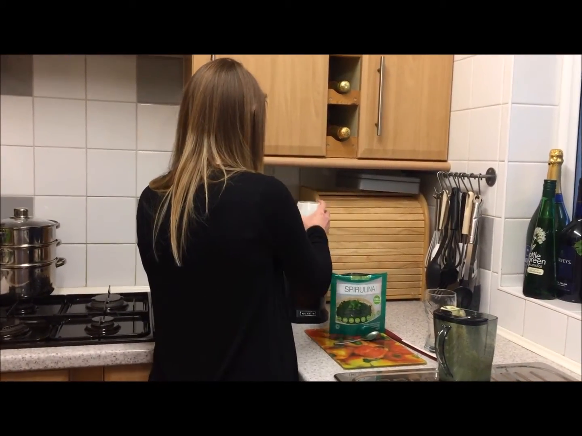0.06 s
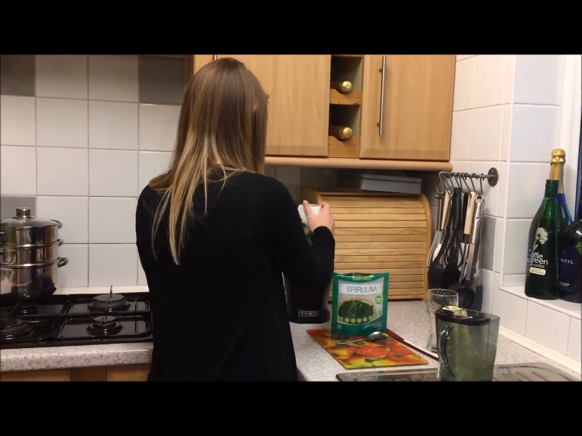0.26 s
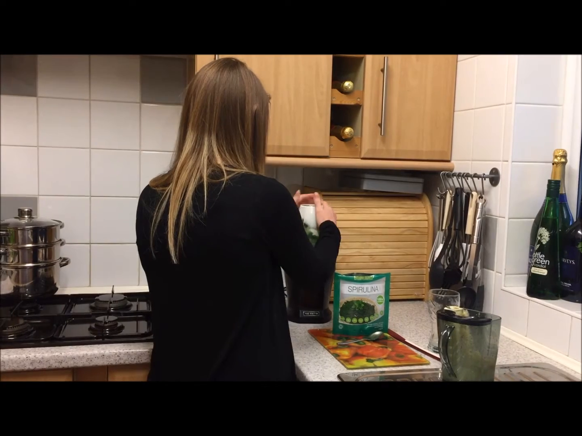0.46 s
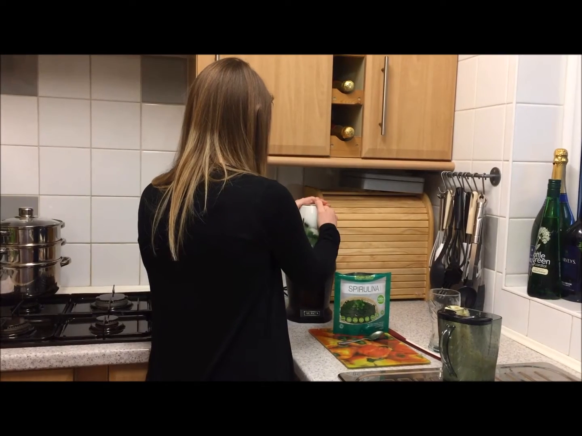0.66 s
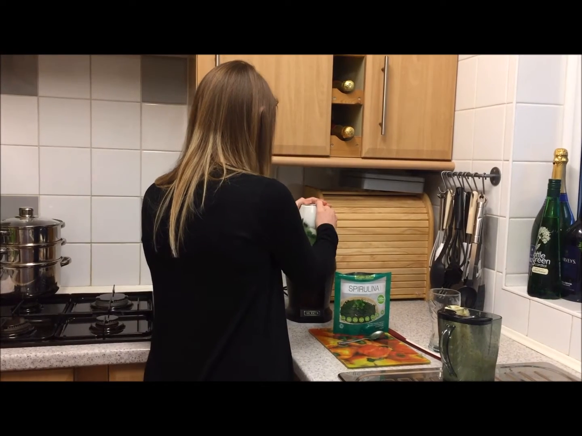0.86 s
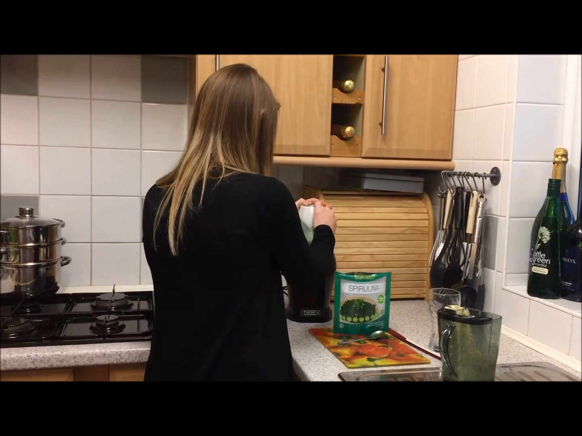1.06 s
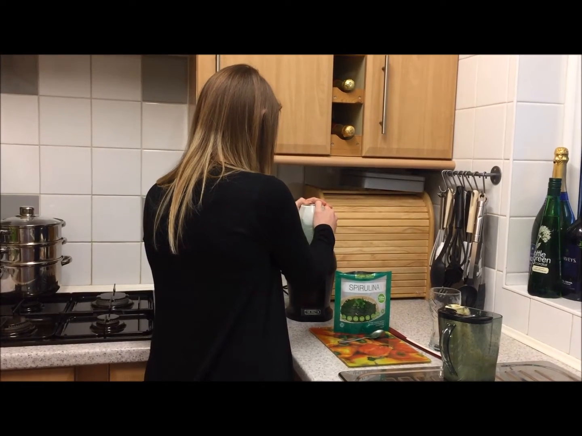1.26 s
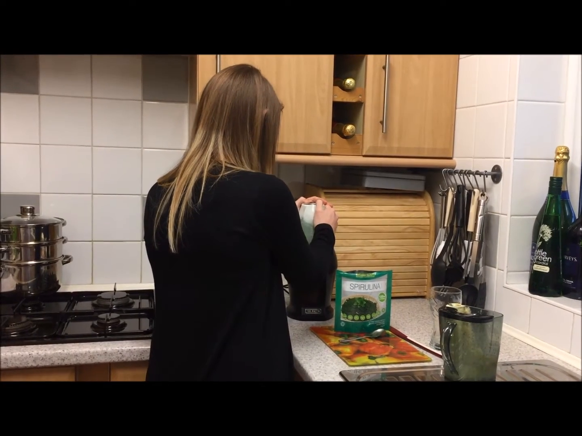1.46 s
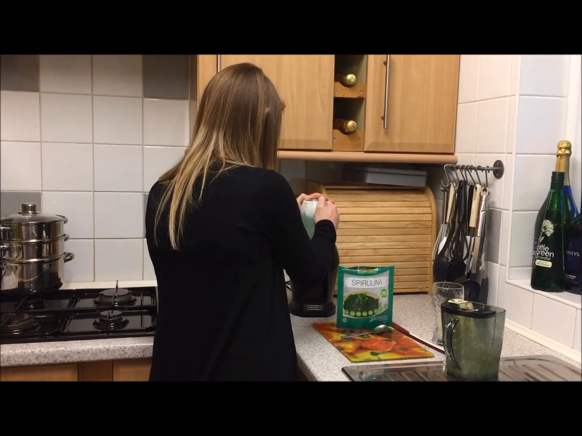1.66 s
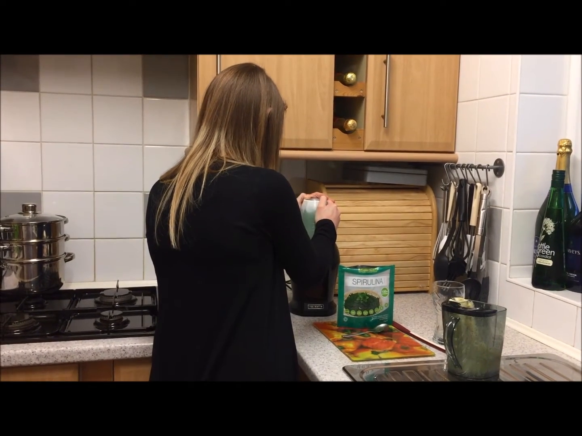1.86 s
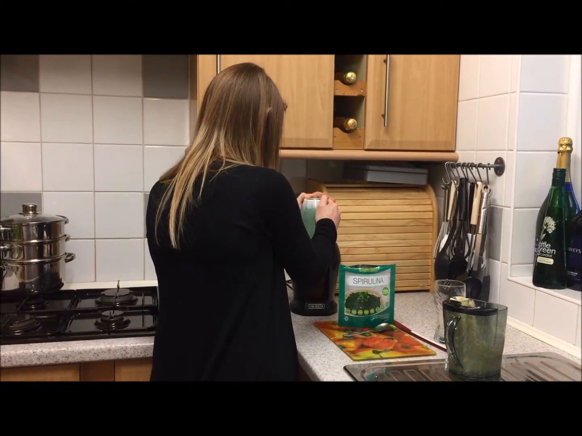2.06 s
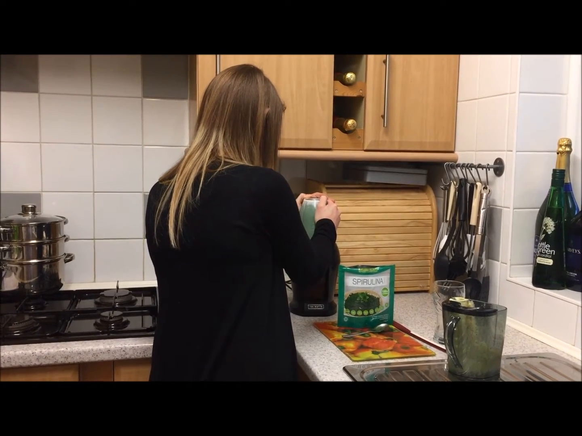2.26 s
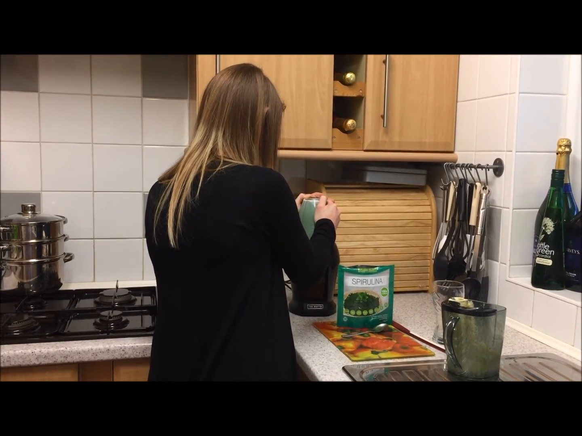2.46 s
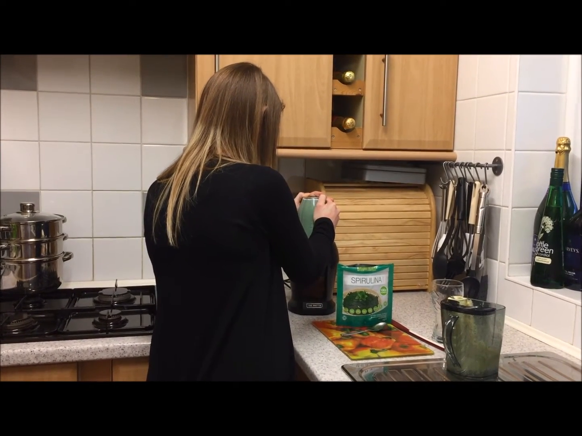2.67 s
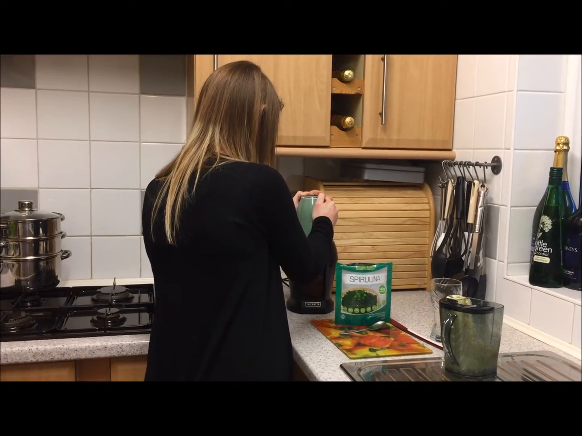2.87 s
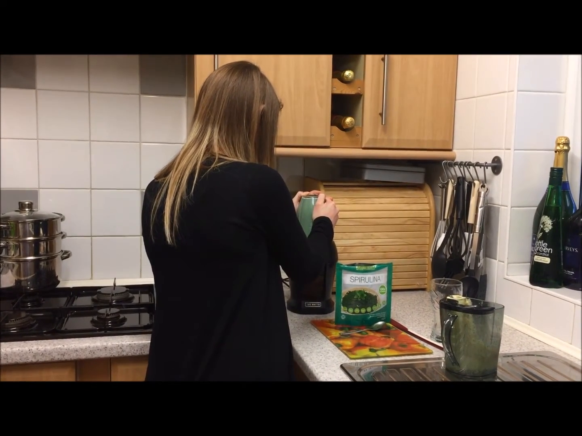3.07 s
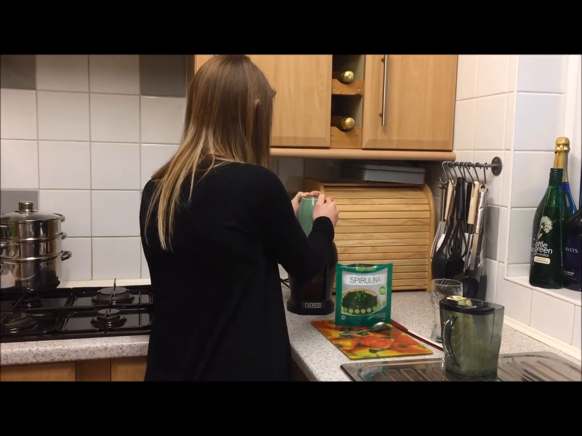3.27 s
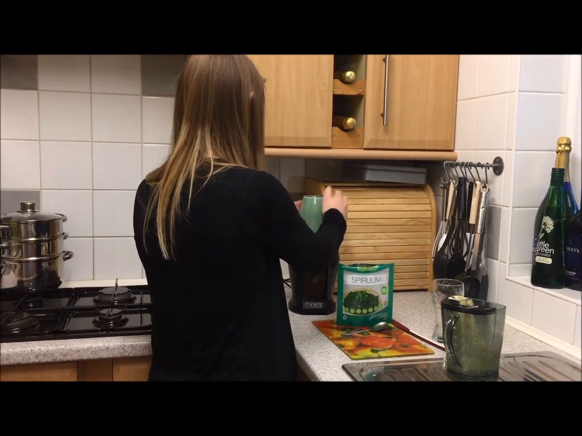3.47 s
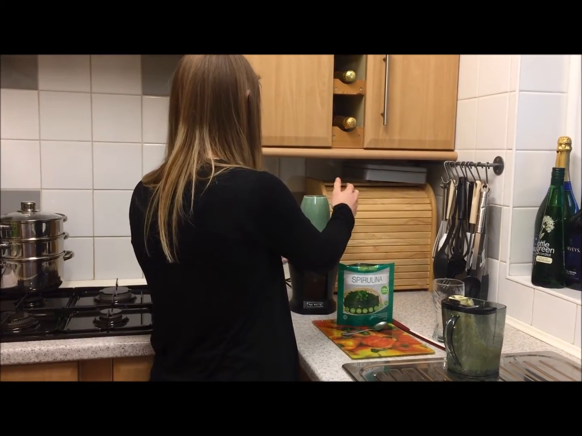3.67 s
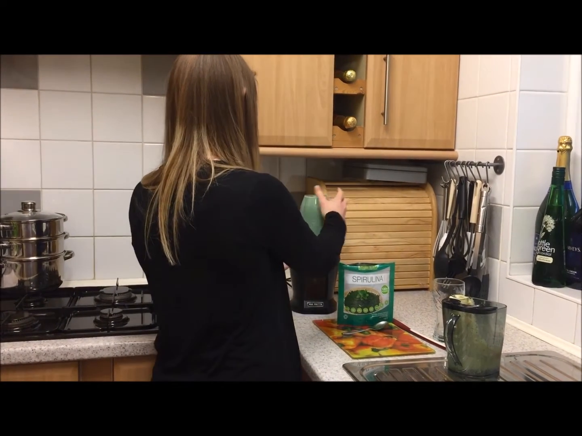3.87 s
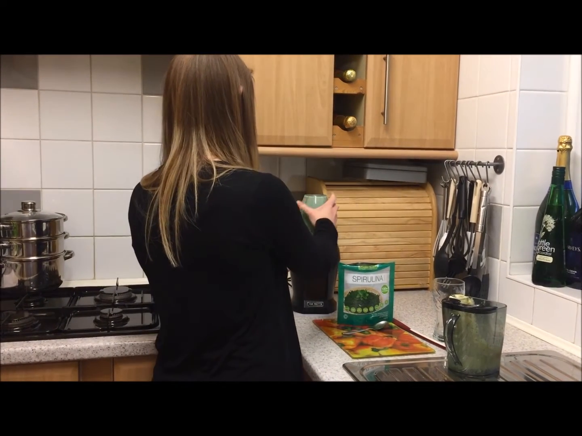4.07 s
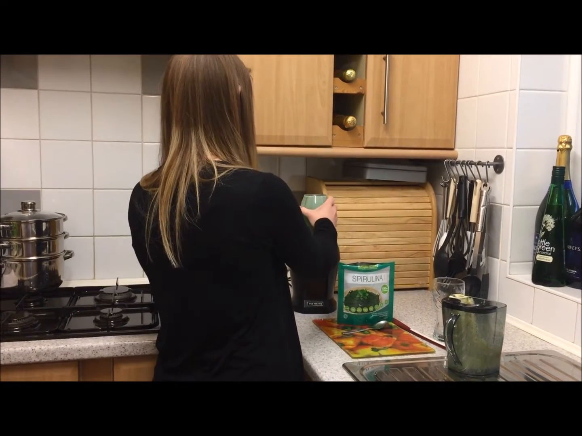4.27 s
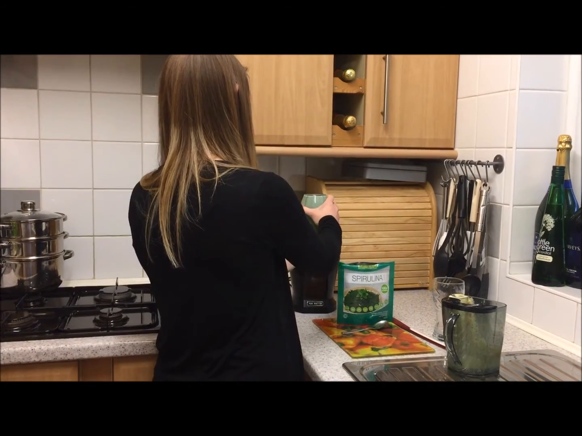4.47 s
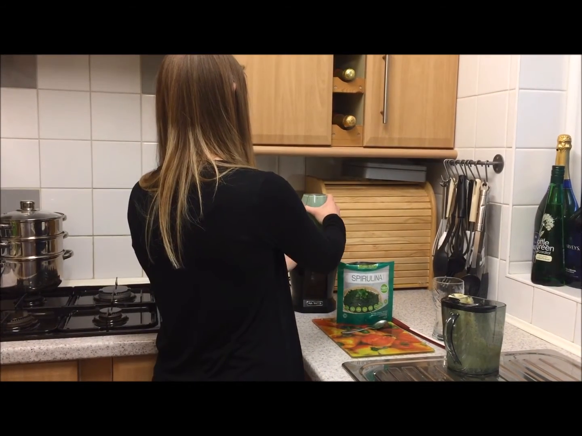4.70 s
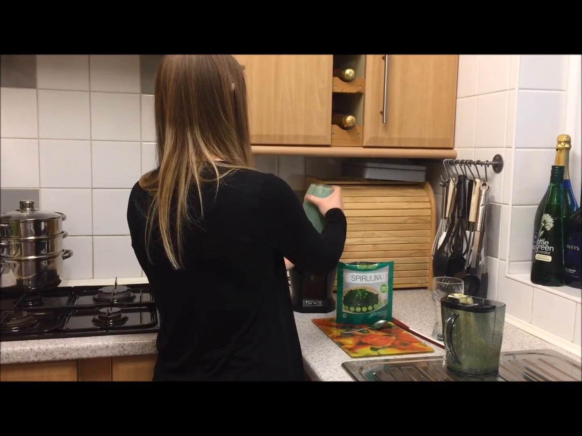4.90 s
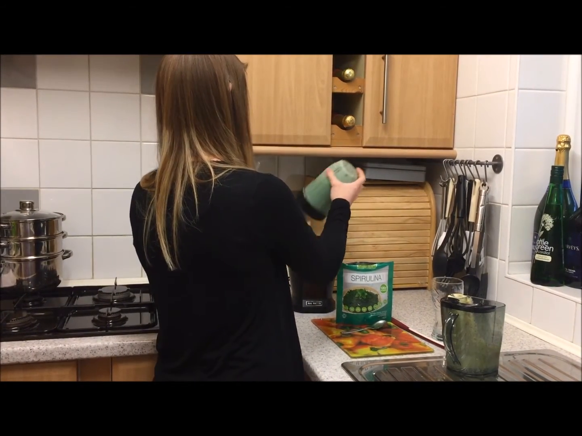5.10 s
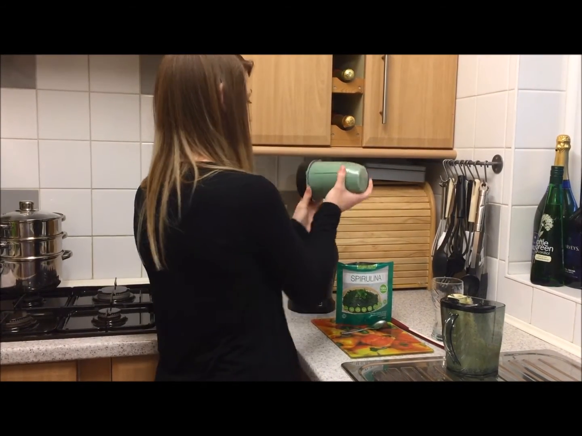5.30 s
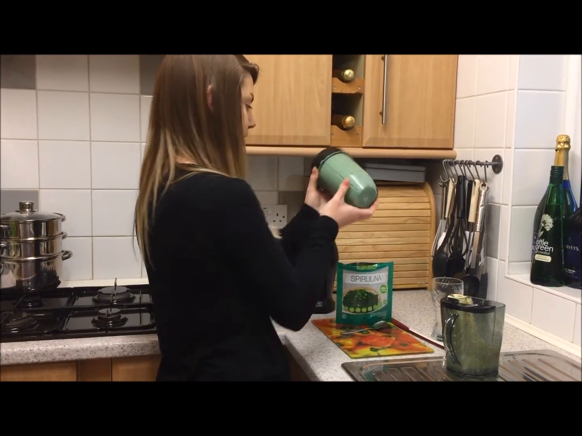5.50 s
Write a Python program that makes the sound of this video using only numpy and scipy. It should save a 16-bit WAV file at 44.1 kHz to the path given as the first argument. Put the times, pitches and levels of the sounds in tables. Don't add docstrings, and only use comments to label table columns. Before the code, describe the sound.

Close on a tiled kitchen counter, hands thump and rustle a plastic cup onto a blender base. After a pause, lugs clack and the motor spins up with a rough grind. It suddenly jumps two octaves into a shrill, hissing, fast-forward whine, then drops back and coasts down. A small squeak, a loud unlocking clack and a few light knocks follow over faint fridge hum.

```python
import sys
import numpy as np
from scipy import signal
from scipy.fft import rfft, irfft, next_fast_len
from scipy.io import wavfile
from scipy.ndimage import uniform_filter1d, minimum_filter1d

SR = 44100
rng = np.random.default_rng(int(sys.argv[2]) if len(sys.argv) > 2 else 0)


def generate_wav(sig):
    pcm = np.round(np.clip(np.atleast_2d(sig).T, -1, 1) * 32767).astype(np.int16)
    wavfile.write(sys.argv[1], SR, pcm)


def volts_from_db(level):
    exponent = np.asarray(level, float) / 20
    return 10 ** exponent


N = 244342

FAST, FAST_FROM, FAST_TO = 4, 1.569, 3.470
POWER_OFF = 3.336
FREE_HZ = 251.5
# time in seconds, level in dB.
GRIND_LEVEL = [(1.105, -32.5), (1.14, -29), (1.2, -29), (1.235, -23.5), (1.265, -29.5), (1.34, -26),
               (1.37, -26.5), (1.43, -25), (1.56, -25.5), (1.58, -29.5), (3.33, -29.5), (3.355, -31),
               (3.42, -31), (3.47, -33), (3.62, -38), (3.8, -44), (4.05, -61.5), (4.2, -81)]
# frequency in Hz, density in dB per Hz.
COUNTER_COLOUR = [(30, -29), (60, -6.5), (110, -5), (170, 7.5), (300, 6.5), (400, -0.5), (500, -7.5),
                  (900, -8), (1500, -45)]


def evened(x):
    return x / np.sqrt(np.mean(x ** 2) + 1e-20)


def add(mix, s, sound):
    part = mix[round(s * SR):][:len(sound)]
    part += sound[:len(part)]


def drift(size, per_s):
    knots = rng.standard_normal(int(size / SR * per_s) + 2)
    return np.interp(np.arange(size) * per_s / SR, np.arange(len(knots)), knots)


def coloured(x, points, speed=1, casing=0, low_hz=0, high_hz=30000):
    # true-speed frequency in Hz, width in Hz, lift in dB.
    resonances = [(56.4, 3.3, 13), (79, 8, 9), (178.6, 33, 4.5), (215, 12, -3), (280, 10, 8.5),
                  (323, 16, 3.5), (383.2, 3.6, 10.5), (642, 6.6, 7.5), (1298, 86, 1), (1622, 72, 6),
                  (1918, 73, 9), (2138, 81, 10.5), (1290, 14, 8), (2990, 46, 9), (3190, 28, 9),
                  (3740, 78, 10.5)]
    size = next_fast_len(len(x), True)
    hz = np.fft.rfftfreq(size, 1 / SR) + 1
    f, db = np.transpose(points)
    db = np.interp(np.log(hz), np.log(f), db)
    lift_db = sum(up / (1 + (2 * (hz / speed - c) / w) ** 2) for c, w, up in resonances)
    db = db + casing * lift_db
    edges = 1 / np.sqrt((1 + (low_hz / hz) ** 8) * (1 + (hz / high_hz) ** 8))
    return irfft(rfft(x, size) * volts_from_db(db) * edges, size)[:len(x)]


def kitchen():
    # frequency in Hz, density in dB per Hz.
    air_colour = [(18, -47), (30, -19), (90, -2.5), (245, -9.5), (328, -11.5), (486, -17.5), (780, -12),
                  (866, -14.5), (1860, -20), (2350, -23), (16000, -39)]
    # frequency in Hz, level in dB.
    fridge_tones = [
        (786, -75.5),
        (931, -85),
    ]
    t = np.arange(N) / SR
    air = volts_from_db(-69) * evened(coloured(rng.standard_normal(N), air_colour, 0.86, 0.5))
    hum = np.zeros(N)
    for hz, db in fridge_tones:
        hum += volts_from_db(db + 1.5 * drift(N, 16)) * np.sqrt(2) * np.sin(2 * np.pi * hz * t)
    return (air + hum) * np.where((t < FAST_FROM) | (t > FAST_TO), 1, volts_from_db(-25))


def played(t, touches, level_db):
    rise_share, let_go_db = 0.12, -26.5
    out = np.zeros(len(t))
    for (s, length, *_), db in zip(touches, level_db):
        u = (t - s) / length
        out += np.clip(u / rise_share, 0, 1) * volts_from_db(db + let_go_db * np.clip(u, 0, 9) ** 2)
    return out


def hands():
    # start in seconds, length in seconds, rumble in dB, rustle in dB,
    # deep boom in dB over the rumble.
    touches = [(0.0, 0.056, -48, -68, 4), (0.059, 0.14, -39.5, -53, 4), (0.18, 0.21, -36.5, -62, 1),
               (0.288, .17, -33, -59.5, -4), (0.447, 0.43, -58.5, -99, -3), (.75, 0.34, -83, -90, 36.5),
               (0.907, 0.31, -71, -74.5, 11), (3.97, 0.19, -57, -74, -10), (4.196, 0.2, -70, -70, 3),
               (4.4, 0.25, -66, -79, -0.5), (4.61, 0.24, -72, -64.5, 0), (4.816, 0.079, -71, -81, 8),
               (4.939, 0.17, -52.5, -70, -20), (5.03, 0.12, -57, -50.5, 3), (5.08, 0.25, -73, -94, 25),
               (5.226, .14, -72, -94, -3.5), (5.355, 0.37, -72, -70, 7.5)]
    # frequency in Hz, density in dB per Hz.
    rub_colour = [(500, 14.5), (900, 1.5), (1500, -3.5), (2000, -5), (2800, -7.5), (5000, -11.5),
                  (16000, -26.5)]
    # start in seconds, frequency in Hz, level in dB, t60 in seconds.
    squeaks = [
        (4.207, 4750, -68, .2),
        (4.22, 3880, -59.5, 0.23),
        (4.224, 3300, -61, 0.28),
        (4.235, 3640, -61, .2),
        (4.251, 1750, -66, .25),
    ]
    t = np.arange(N) / SR
    rumble_db, rustle_db, boom_db = np.transpose(touches)[2:]
    rumble = coloured(rng.standard_normal(N), COUNTER_COLOUR, 0.96, 2.35)
    grain = rng.standard_normal(N) * volts_from_db(3.0 * drift(N, 260))
    rustle = evened(coloured(grain, rub_colour, 1, 0.6, 1100))
    boom = evened(coloured(rumble, [(20, 0), (20000, 0)], 1, 0, 0, 95))
    out = played(t, touches, rumble_db) * evened(rumble)
    out += played(t, touches, rumble_db + boom_db - 14) * boom
    out += played(t, touches, rustle_db) * rustle

    t = np.arange(SR // 4) / SR
    for s, hz, db, t60 in squeaks:
        scattered = 1.4 * np.exp(-t / 0.0065) + drift(len(t), 600) * volts_from_db(-60 * t / t60)
        add(out, s, volts_from_db(db) * scattered * np.clip(t / 0.0029, 0, 1) * np.sin(2 * np.pi * hz * t))
    return out


def ring(modes, t, spread):
    out = np.zeros(len(t))
    for (hz, db, t60), (a, b, c) in zip(modes, rng.random((len(modes), 3))):
        fade = volts_from_db(db + 5 * a - 60 * t / min(t60, 0.32))
        out += fade * np.sin(2 * np.pi * (hz * (1 + spread * (b - 0.5)) * t + c))
    return out


def knocks():
    # time in seconds, peak in dB, counter thump in dB over it, t60 in seconds, rise in seconds.
    blows = [(0.072, -40, 9, 0.35, 0.0035), (0.193, -39, 16, 0.35, 0.01), (0.296, -41, 9.5, 0.21, 0.0061),
             (0.313, -39, 7.5, 0.27, 0.0091), (0.343, -53.5, 12.5, 0.22, 0.013),
             (1.109, -16.5, -25, 0.29, 0.026), (1.143, -18, -13, 0.096, 0.0041),
             (4.658, -19.5, -7.5, 0.3, 0.012), (4.94, -65, 2, 0.12, 0.017), (4.972, -60, -1, 0.18, 0.006),
             (5.005, -49, -16, 0.25, 0.008), (5.047, -65, 10.5, 0.25, 0.0067),
             (5.06, -50.5, -24, 0.18, 0.0063)]
    # frequency in Hz, level in dB, t60 in seconds.
    cup_modes = [(1315, 11.5, 0.12), (1700, -7, 0.61), (1750, -4, 0.96), (1960, -16, 0.077),
                 (2290, -9, 0.39), (2690, 1, 0.25), (2853, -28, 0.34), (3280, 5, 0.16), (3500, 5, 0.18),
                 (4730, -9, 0.48)]
    # frequency in Hz, density in dB per Hz.
    clack_colour = [(400, -31.5), (600, -7), (900, -10), (1250, -2.5), (1750, 0), (2700, -2), (4500, -9),
                    (7000, -14.5), (15500, -29)]
    snap_db, snap_hz, snap_share = -13.5, 6140, 0.78
    thump_t60 = 0.3
    out, t = np.zeros(N), np.arange(SR // 2) / SR
    for s, db, thump_db, t60, rise in blows:
        scatter = rng.standard_normal(len(t)) * volts_from_db(1.8 * drift(len(t), 300))
        tiles = evened(coloured(scatter, clack_colour, high_hz=snap_hz))
        cup = ring(cup_modes, t, 0.051) * volts_from_db(3.0 * drift(len(t), 140))
        clack = tiles * volts_from_db(-60 * t / t60) + 0.33 * cup / np.std(cup[:1000])
        clack = clack * np.clip(t / max(rise, 0.001), 0, 1)

        snap = evened(coloured(rng.standard_normal(len(t)), [(20, 2.5), (20000, -8.5)], low_hz=snap_hz))
        snap = snap * volts_from_db(snap_db - 60 * t / (snap_share * t60)) * np.clip(t / (0.5 * rise), 0, 1)

        thump = evened(coloured(rng.standard_normal(len(t)), COUNTER_COLOUR, 1.0, 0.72))
        thump = thump * volts_from_db(-60 * t / thump_t60) * np.clip((t - 0.009) / 0.012, 0, 1)
        add(out, s - 0.004, volts_from_db(db) * (clack + snap + volts_from_db(thump_db) * thump))
    return out


def shaft(t):
    # time in seconds, shaft speed in Hz.
    climb = [(1.105, 128), (1.14, 150), (1.2, 166), (1.3, 192), (1.4, 207), (1.568, 236)]
    # time in seconds, heard shaft speed in Hz.
    loaded = [(1.575, 962), (1.62, 982), (1.68, 997), (1.75, 1006), (1.96, 1007), (2.03, 1002), (2.3, 998),
              (2.51, 980), (2.8, 964), (2.93, 959), (3.07, 963), (3.33, 954)]
    coast_s = 0.5
    s, hz = np.transpose(list(climb) + [(s, hz / FAST) for s, hz in loaded])
    idle_s = FAST * np.clip(t - POWER_OFF, 0, FAST_TO - POWER_OFF) + np.maximum(t - FAST_TO, 0)
    return np.interp(t, s, hz) * np.exp(-idle_s / coast_s)


def motor(t, layers, colour, speed, bass_hz, low_hz, split_hz, slosh_db, chop_db, waver_db, lift, whine_db):
    # shaft order, level in dB over the grind, then the side tones that mains ripple adds
    # below and above it, in dB.
    orders = [(1, -60, -21, -10), (2, -60, -11, -8.5), (3, -7.5, -24, -13), (4, -12.5, -17, -12),
              (5, -14, -19, -14), (7, -15, -24, -17), (8, -15, -22, -21), (9, -18, -22, -17),
              (12, -7, -21, -19)]
    # time in seconds, whine in dB, rumble in dB.
    thickening = [
        (2.25, 0, -3.5),
        (2.8, -2, -1.5),
        (3.2, -3, 3.5),
    ]
    ripple_hz, sag_hz = 100.08, 12
    size, hz = len(t), shaft(t)
    live = np.clip((POWER_OFF - t) / 0.0066, 0, 1)
    load = live * np.clip((FREE_HZ - hz) / sag_hz, 0, 1)
    octaves = np.log2(FREE_HZ / hz)
    treble_db, bass_db, first_db, second_db = (
        db + more * load + on * live + slope * octaves for db, more, on, slope in layers)
    turns = np.cumsum(speed * hz) / SR

    chops = volts_from_db(chop_db * np.minimum(rng.exponential(1, size), 4))
    rush = chops * rng.standard_normal(size) * volts_from_db(slosh_db * drift(size, 45 * speed))
    bass = evened(coloured(rush, colour, speed, 0.93, 0, bass_hz))
    body = coloured(rush, colour, speed, 1.0, bass_hz, split_hz)
    body = body / np.std(coloured(rush, colour, speed, 1, low_hz, split_hz))
    top = evened(coloured(rush, colour, speed, 0.56, split_hz))

    whine = np.zeros(size)
    for order, db, below_db, above_db in orders:
        for side, side_db in ((0, db), (-1, below_db), (1, above_db)):
            phase = order * turns + side * ripple_hz * speed * t + 0.01 * order * drift(size, 40)
            flutter = drift(size, 25) + 1.5 * drift(size, 3)
            tone = volts_from_db(side_db + waver_db * flutter) * np.cos(2 * np.pi * (phase + rng.random()))
            whine += tone * (live if side else 0.35 + 0.65 * live)
    whine = coloured(whine, [(310, -6.5), (400, whine_db)])
    whine = coloured(whine, [(20, 0.0091), (20000, 0)], speed, lift)

    unbalance = volts_from_db(first_db) * np.cos(2 * np.pi * turns) + volts_from_db(second_db) * np.cos(4 * np.pi * turns)
    unbalance = coloured(unbalance, [(20, 0.0049), (20000, 0.0016)], speed, 1.1)
    unbalance = unbalance * volts_from_db(0.5 * waver_db * drift(size, 40))

    s, *thick = np.transpose(thickening)
    sink_db, rumble_db = (np.interp(t, s, db) for db in thick)
    noise = body + volts_from_db(treble_db) * top + volts_from_db(bass_db + rumble_db) * bass
    grind = volts_from_db(np.interp(t, *np.transpose(GRIND_LEVEL)))
    return grind * (noise + volts_from_db(sink_db) * whine) + np.sqrt(2) * unbalance


def blender():
    # frequency in Hz, density in dB per Hz.
    up_colour = [(24, -57.5), (40, -27), (71, -23), (103, -25.5), (170, -14), (388, -8.5), (474, -11),
                 (623, -7.5), (706, -6.5), (3760, -10.5), (15600, -21)]
    run_colour = [(60, -72), (140, -31.5), (231, -15.5), (454, -32), (707, -14), (832, -20), (956, -8.5),
                  (1260, -14.5), (2990, -12.5), (3440, -15), (7580, -8.5), (10600, -6), (12300, -2.5),
                  (15600, -3)]
    coast_colour = [(24, -40.5), (40, -23), (69, -9), (103, -32), (174, -2.5), (318, 3), (498, -3),
                    (536, 0.5), (1290, 0.5), (2400, -11), (3760, -14.5), (15600, -43.5)]
    # level in dB,
    # dB more under load, dB more with current on, dB per octave of lost speed.
    up_layers = [
        (-6.5, -1.5, -0.5, 8),
        (-31.5, 0.5, -0.5, 25.5),
        (-35, -1, 1, -8.5),
        (-32.5, -3, 1.5, -12),
    ]
    run_layers = [
        (0, 3, 2.5, -9),
        (-26, 1, -2, 2),
        (-36, 6, 3, -20),
        (-41, -7, 0, -8),
    ]
    coast_layers = [
        (-4.5, 0, 0, -4),
        (-36.5, 0, 0, 10.5),
        (-70, 0, 0, -6),
        (-66, 0, 0, -8),
    ]
    out, splice = np.zeros(N), 0.004

    def fade_in(t, s):
        return np.clip((t - s) / splice + 0.5, 0, 1)

    def fade_out(t, s):
        return np.clip((s - t) / splice + 0.5, 0, 1)

    t = np.arange(GRIND_LEVEL[0][0], FAST_FROM + splice, 1 / SR)
    up = motor(t, up_layers, up_colour, speed=1, bass_hz=140, low_hz=500, split_hz=4500,
               slosh_db=1.2, chop_db=1.5, waver_db=4.0, lift=1.3, whine_db=-12)
    add(out, t[0], up * np.clip((t - t[0]) / 0.011, 0, 1) * fade_out(t, FAST_FROM))

    t = np.arange(FAST_FROM - splice, FAST_TO + splice, 1 / SR)
    run = motor(t, run_layers, run_colour, speed=FAST, bass_hz=450, low_hz=1100, split_hz=6000,
                slosh_db=0.8, chop_db=1.5, waver_db=1.5, lift=0.5, whine_db=0)
    add(out, t[0], run * fade_in(t, FAST_FROM) * fade_out(t, FAST_TO))

    t = np.arange(FAST_TO - splice, GRIND_LEVEL[-1][0], 1 / SR)
    coast = motor(t, coast_layers, coast_colour, speed=1, bass_hz=120, low_hz=500, split_hz=3300,
                  slosh_db=1.2, chop_db=1.05, waver_db=4.2, lift=0.55, whine_db=-12)
    add(out, t[0], coast * fade_in(t, FAST_TO))
    return out


def scene():
    mono = kitchen() + hands() + knocks() + blender()
    return np.array([mono, mono])


def starve(x, band_hz=850, low_band_hz=350, boost_db=5, faint_db=-49, lost_db=-25):
    # time in seconds, level left between the kept lines in dB.
    starved = [(0.227, 0), (0.378, -2), (1.658, -17), (1.701, -14), (1.744, -16), (1.853, -20),
               (1.952, -14), (2.318, -8), (2.362, -19), (2.533, -18.5), (2.576, -13), (2.68, -18.5),
               (2.702, -38), (3.042, -13), (3.213, -40.5), (3.234, -42), (4.282, -13)]
    out, size = x.copy(), 2 * round(1024 * SR / 48000)
    window = np.sin(np.pi * (np.arange(size) + 0.5) / size)
    hz = np.fft.rfftfreq(size, 1 / SR)
    for s, left_db in starved:
        at = round(s * SR) - size // 2
        z = rfft(x[at:at + size] * window)
        size_of = abs(z)
        wide, narrow = (-minimum_filter1d(-size_of, round(w * size / SR)) for w in (band_hz, low_band_hz))
        tops = size_of >= np.where(hz < 1800, narrow, wide)
        kept = uniform_filter1d(tops * 1.0, size=3) > 0
        quiet = size_of < 0.3 * size_of.max()
        gain = np.where(kept, volts_from_db(boost_db * quiet), volts_from_db(left_db))
        faint = uniform_filter1d(size_of, size=31) < volts_from_db(faint_db) * size_of.max()
        gain = np.where(faint, volts_from_db(lost_db), gain)
        out[at:at + size] += irfft(z * (gain - 1), size) * window
    return out


def split(x, side_db=-0.5):
    # time in seconds, lower edge in Hz, upper edge in Hz.
    parted_bands = [(1.421, 4600, 5700), (1.421, 7500, 11800), (1.793, 10300, 11800), (1.816, 9600, 11100),
                    (1.909, 7500, 9100), (1.978, 14400, 16000), (2.094, 11000, 12600),
                    (2.211, 13700, 16000), (2.304, 5500, 7000), (2.652, 5500, 9100), (2.721, 6200, 7700),
                    (2.791, 4100, 5300), (2.791, 12400, 13900), (2.884, 6200, 9700), (2.907, 6800, 12500),
                    (2.907, 13000, 14600), (2.977, 6800, 8400), (3.372, 13000, 14600)]
    side, hz = np.zeros(N), np.fft.rfftfreq(2048, 1 / SR)
    window = signal.windows.kaiser_bessel_derived(2048, 4 * np.pi)
    for s, low_hz, high_hz in parted_bands:
        at = round(s * SR) - 1024
        z = rfft(x[at:at + 2048] * window) * (hz > low_hz) * (hz < high_hz)
        side[at:at + 2048] += irfft(abs(z) * np.exp(2j * np.pi * rng.random(len(hz)))) * window
    return volts_from_db(side_db) * side


def roll_off(x):
    return signal.sosfilt(signal.butter(12, 16540, fs=SR, output="sos"), x)


def record(dry):
    limited = 0.55 * np.tanh(dry[0] / 0.55)
    top_edge = signal.firwin(1001, 15760, window=("kaiser", 9), fs=SR)
    mid = signal.oaconvolve(starve(limited), top_edge, "same")
    side = split(mid)
    return roll_off(np.array([mid + side, mid - side]))


dry = scene()
out = record(dry)
generate_wav(out)
```